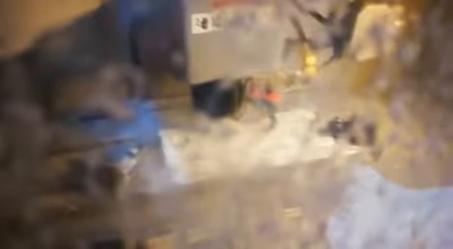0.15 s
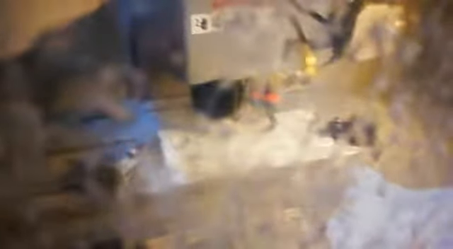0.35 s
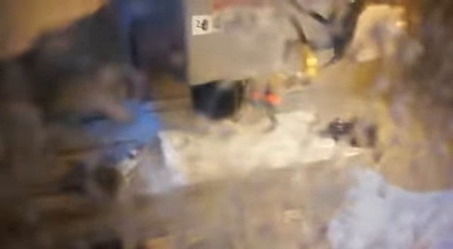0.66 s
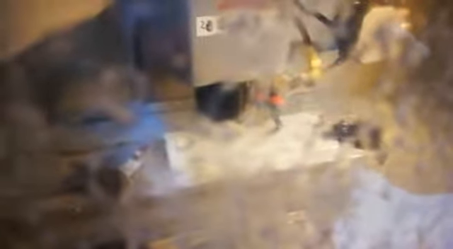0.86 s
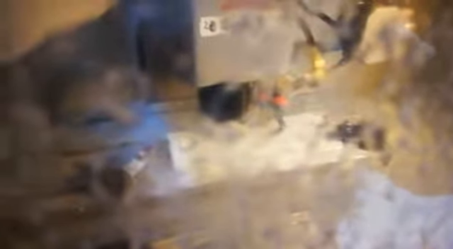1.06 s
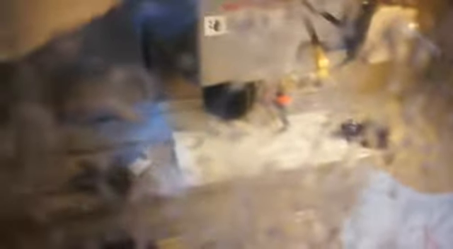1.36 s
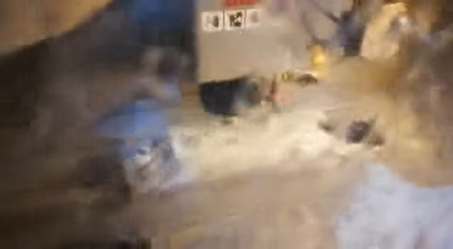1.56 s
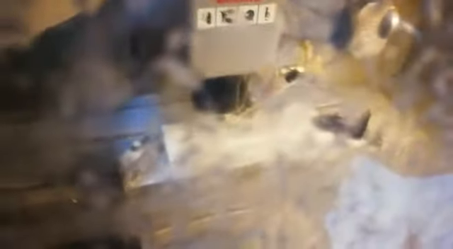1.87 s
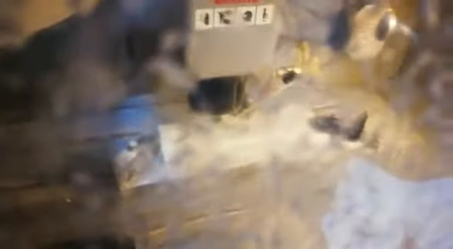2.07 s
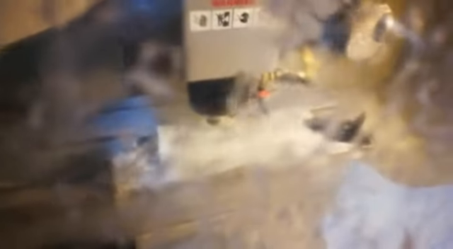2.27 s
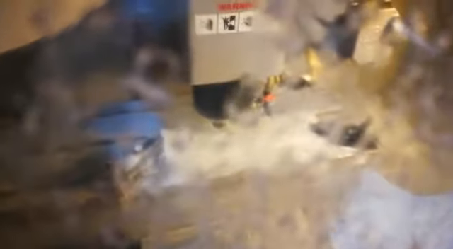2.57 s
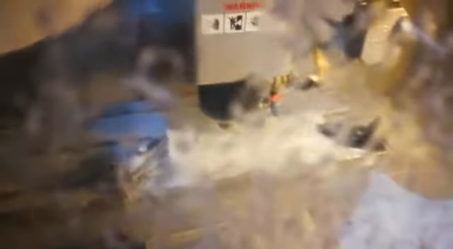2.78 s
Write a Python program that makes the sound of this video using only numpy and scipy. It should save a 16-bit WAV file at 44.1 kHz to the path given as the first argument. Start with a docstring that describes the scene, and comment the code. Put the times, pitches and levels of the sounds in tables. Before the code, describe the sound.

A machining centre drones steadily with deep electrical hum, thin high whine and hissing coolant spray

```python
"""Machining centre with coolant

A machining centre runs steadily with its coolant on, heard from close by the cabinet.
Mains hum drones as sine partials and beats against a motor shaft order; buzz, tones and a whistle waver.
The drive whines, its sidebands and overtones pulsing once a turn.
The housing rumbles and the coolant hisses and splashes as shaped noise, ringing in the sheet metal."""
import sys
import numpy as np
from scipy import signal
from scipy.fft import rfft, irfft
from scipy.io import wavfile
from scipy.ndimage import uniform_filter1d

SR = 44100
rng = np.random.default_rng(int(sys.argv[2]) if len(sys.argv) > 2 else 0)


def dump_mix(stems):
    """Bounce the given channels to the path in sys.argv[1] as a 16-bit WAV at rate SR."""
    frames = np.atleast_2d(stems).T  # one column per channel
    limited = np.clip(frames, -1, 1)  # hard clip at full scale
    pcm = np.round(limited * 32767).astype(np.int16)
    wavfile.write(sys.argv[1], SR, pcm)


N = 128772

# Rumble of the housing. Each row: frequency in Hz, base level in dB per Hz.
RUMBLE = [(20, -82), (40, -74), (75, -70), (115, -63), (150, -64.5), (205, -64.5), (255, -54), (310, -56.5),
          (370, -64.5), (440, -74), (700, -92.5)]
# Coolant spray. Each row: frequency in Hz, base level in dB per Hz, left-right difference in dB.
SPRAY = [(200, -74, 2), (450, -73, 3.5), (700, -71.5, 5), (1020, -72.5, 6), (1320, -71, 5),
         (1590, -74.5, 2.5), (2050, -69, 1.5), (2400, -74.5, -1.5), (2840, -78, 8.5), (3350, -76, 3),
         (4120, -74, 7.5), (4400, -71, 0), (4930, -77.5, 4.5), (6240, -78, 0.5), (8060, -74, 1),
         (8780, -71.5, 1.5), (10040, -78, 5.5), (11300, -81, 3), (13400, -78.5, 3), (14300, -83, 2),
         (15700, -87, 2)]
# Low splash. Each row: time in s, gain in dB.
LOW_SPLASH = [(0, -1.5), (.5, 2.5), (.65, 1), (.9, 4.5), (1.02, 0), (1.35, 2), (1.6, 0.5), (2.2, -0.5),
              (2.9, 3)]
# Brighter splash. Each row: time in s, gain in dB.
BRIGHT_SPLASH = [(0, -1.5), (.5, -1.5), (.7, -2.5), (1.3, 0), (1.68, 2), (1.88, 2.5), (2.05, 2.5), (2.3, 0),
                 (2.7, 0), (2.9, 1)]
# Top treble of the spray. Each row: time in s, gain in dB.
FIZZ = [(0, 2), (.25, 3.3), (.5, -0.3), (1.2, 1.3), (1.8, 0.3), (2.3, -3.2), (2.9, -1.5)]
# Whine and sidebands. Each row: offset in shaft rates (used rounded, halves to even), base level in dB,
# left-right difference in dB.
SIDEBANDS = [(-1.5, -51.5, -3), (-1, -48, 6.5), (0, -46.5, -1.5), (2, -54.5, 4), (2.5, -49.5, -2.5),
             (2, -57, -2.5)]
# Overtones of the whine. Each row: multiple, base level in dB, left-right difference in dB.
OVERTONES = [(2, -46, 0), (3, -56, -2)]
# Whine gain. Each row: time in s, gain in dB.
WHINE_GAIN = [(0, 1.5), (.3, .5), (.6, -1.5), (1.4, -1), (1.65, 0.5), (2, 1.2), (2.3, .3), (2.9, -0.3)]
# Motor orders. Each row: multiple of the shaft rate, level in dB, left-right difference in dB.
ORDERS = [(1, -59, 0), (3, -48.5, 0), (7, -45, 4), (8, -54, -2), (9, -51.5, 21), (11, -56, 13),
          (12, -65, 9), (13, -60, -9)]
# Steady tones of pumps and bearings. Each row: frequency in Hz, level in dB, left-right difference in dB.
TONES = [(346, -46, 4), (356, -46.5, -29), (1116, -62, 4.5), (1453, -57, 18), (2000, -59, 5),
         (4100, -79, 3), (4156, -74, 6)]
# Two-note whistle. Each row: frequency in Hz, base level in dB, left-right difference in dB.
WHISTLE = [(3678, -51, 4), (3765, -56, 2)]
# Whistle gain. Each row: time in s, gain in dB.
WHISTLE_GAIN = [(0, 3.5), (.3, 5), (.7, -4), (1.1, -8), (1.7, 0.5), (2.3, 2), (2.65, 5), (2.9, 0)]
# Throb and rumble gain. Each row: time in s, gain in dB.
THROB_GAIN = [(0, -2.5), (.35, -1), (.75, 1.5), (1.0, -1.5), (1.3, -3.5), (1.6, -1), (1.95, 2.5), (2.3, 0),
              (2.6, -1), (2.9, .5)]
# Drone. Each row: time in s, fundamental in dB, octave in dB (both before their trims).
DRONE = [(0.03, -21.5, -30), (0.08, -21.5, -29), (0.34, -23.5, -22.5), (0.93, -25.5, -22.5),
         (1.11, -23.5, -22.5), (1.43, -24, -24), (1.66, -22.5, -27.5), (1.83, -23.5, -31), (1.99, -24, -32),
         (2.39, -20.5, -25), (2.63, -24.5, -21.5), (2.88, -25, -19.5)]
# Buzz partials. Each row: multiple of the buzz rate, base level in dB, left-right difference in dB.
BUZZ = [(4, -50, 7.5), (5, -57, 18), (6, -54.5, 9), (7, -53, 6), (8, -62.5, 7), (9, -55, 13),
        (10, -54.5, 14), (11, -64, 0), (12, -58.5, 4), (14, -55, 13), (15, -56, 0), (17, -65, -6),
        (18, -57.5, 5), (20, -56, -4), (21, -65, -4)]
# Buzz gain. Each row: time in s, gain up to the tenth partial in dB, gain above it in dB.
BUZZ_GAIN = [(0, -5, -8), (.4, -4, 1.5), (.68, 5, -5), (.95, 4.5, -1), (1.2, 4.5, 0), (1.48, 1, -1),
             (1.7, -3, 4), (2.1, -1.5, 0.5), (2.6, -0.5, 1.5), (2.9, -1, 6.5)]
# Thirteenth buzz partial, the loudest. Each row: time in s, level in dB.
THIRTEENTH = [(0, -57), (.45, -48), (.66, -64), (.9, -52), (1.2, -52), (1.5, -42), (1.8, -47), (1.97, -50),
              (2.25, -49), (2.6, -49), (2.9, -55)]

HUM_HZ, BUZZ_HZ, SHAFT_HZ, WHINE_HZ = 100.0, 100.15, 48.89, 4399.8
HUM_DRIFT_HZ, BUZZ_DRIFT_HZ, SHAFT_DRIFT_HZ = 0.047, 0.062, 0.0082
WHINE_DRIFT_HZ, TONE_DRIFT_HZ = 0.36, 0.43
RUMBLE_SIDE_DB, RUMBLE_SIDE_HZ = -10, 300  # side against mid at this frequency
SPRAY_SWELL_DB, SPRAY_FLICKER_DB, SPRAY_GRAIN_DB = 0.58, 0.85, 1.2
LOW_SPLASH_HZ, BRIGHT_SPLASH_HZ, FIZZ_HZ, SPLASH_OCTAVES = 740, 2340, 13100, 0.69
CABINET_T60_S, SPRAY_WET_DB, WHINE_WET_DB = 0.2, -2.5, -2
WHINE_PEAK_S, WHINE_EAR_LAG_S = 0.0067, 0.00088  # first pulse; delay between the ears
WHINE_SMEAR_RAD = 0.25  # spreads each pulse; times the squared offset
SWING_HZ = 126  # pitch swing per turn, scaled by the overtone's multiple
OVERTONE_PULSE_DB, OVERTONE_WAVER_DB, WHINE_WAVER_DB = 5.5, 1.1, 1.1
WHINE_EAR_RAD, THROB_EAR_RAD = 1.3, 0.5  # phase difference between the ears
THIRD_DB, SIXTH_DB, THROB_PEAK_S, THROB_WAVER_DB = -29.5, -34, 0.21, 1.2  # levels before THROB_GAIN
DRONE_TRIM_DB, OCTAVE_TRIM_DB, DRONE_WAVER_DB = 0.5, 0.5, 0
LOW_WAVER_DB, BUZZ_WAVER_DB, TONE_WAVER_DB, WHISTLE_WAVER_DB = 1.7, 2.5, 2.0, 2.7
THIRTEENTH_PAN_DB = 6
TOP_HZ = 15700
EARS = np.array([[0.5], [-0.5]])  # shares of a difference between left and right


def undb(db):
    """Decibels to gain."""
    return 10 ** (np.asarray(db) / 20)


def curve(rows, axis=1):
    """One column of a table, joined by straight lines in time."""
    rows = np.array(rows)
    return np.interp(np.arange(N) / SR, rows[:, 0], rows[:, axis])


def bins_hz():
    """Frequencies of the spectrum, at least 1 Hz."""
    return np.maximum(np.fft.rfftfreq(N, 1 / SR), 1)


def colour(rows, axis=1):
    """One column of a table, spread over the bins on a log-frequency axis."""
    rows = np.array(rows)
    return np.interp(np.log(bins_hz()), np.log(rows[:, 0]), rows[:, axis])


def noise(channels=2):
    """Unrelated white noises at 0 dB per Hz."""
    return rng.standard_normal((channels, N)) * np.sqrt(SR / 2)


def wander(rate_hz):
    """Random levels held 1 / rate_hz s and slewed twice; zero mean, spread 1."""
    hold = max(int(SR / rate_hz), 1)
    steps = np.repeat(rng.standard_normal(N // hold + 2), hold)
    smooth = uniform_filter1d(uniform_filter1d(steps, hold), hold)[:N]
    return (smooth - smooth.mean()) / smooth.std()


def pan(db):
    """Left and right gains for a level difference, at constant power."""
    db = np.atleast_1d(db)
    gains = undb(np.array([db, -db]) / 2)
    return gains / np.sqrt(np.mean(gains ** 2, axis=0))


def turning(hz, drift_hz):
    """Phase of a rotation whose rate drifts a little."""
    return 2 * np.pi * np.cumsum(hz + drift_hz * wander(3.03)) / SR


def since(phase, start_s):
    """Phase counted from a given moment."""
    return phase - np.interp(start_s * SR, np.arange(N), phase)


def scattered(phase):
    """A partial starts anywhere in its cycle; the higher it is, the more the ears differ, up to a limit."""
    hz = (phase[-1] - phase[0]) * SR / N / (2 * np.pi)
    apart = min(hz / 900, 1.4) * rng.choice([-1, 1]) * EARS
    return phase + apart + rng.uniform(0, 2 * np.pi)


def tone(phase, db, pan_db, waver_db):
    """Sine partial at an RMS level that wavers."""
    waver = undb(waver_db * wander(4.98))
    waver /= np.sqrt(np.mean(waver ** 2))
    return np.sqrt(2) * undb(db) * pan(pan_db) * waver * np.sin(phase)


def free_tones(rows, waver_db):
    """Tones that each drift in pitch on their own."""
    return sum(tone(scattered(turning(hz, TONE_DRIFT_HZ)), db, pan_db, waver_db)
               for hz, db, pan_db in rows)


def cabinet(x, wet_db):
    """Dense decaying reflections between metal walls, different at each ear; power is kept."""
    tail = rng.standard_normal((2, N)) * np.exp(-np.log(1000) * np.arange(N) / SR / CABINET_T60_S)
    tail *= undb(wet_db) / np.sqrt(np.sum(tail ** 2, axis=1, keepdims=True))
    return irfft(rfft(x) * (1 + rfft(tail)), N) / np.sqrt(1 + undb(wet_db) ** 2)


def housing():
    """Low rumble of the panels: shaped noise, wider between the ears as frequency rises."""
    mid, side = rfft(noise()) * undb(colour(RUMBLE))
    width = undb(RUMBLE_SIDE_DB) * np.minimum(bins_hz() / RUMBLE_SIDE_HZ, 2)
    return irfft(mid + width * side * np.array([[1], [-1]]), N)


def splash_db(band_hz):
    """Splash gain of one band: three regions, each fading with distance in octaves."""
    def near(centre_hz):
        return np.exp(-0.5 * (np.log2(band_hz / centre_hz) / SPLASH_OCTAVES) ** 2)

    low = near(LOW_SPLASH_HZ) * curve(LOW_SPLASH)
    bright = near(BRIGHT_SPLASH_HZ) * curve(BRIGHT_SPLASH)
    return low + bright + near(FIZZ_HZ) * curve(FIZZ)


def coolant():
    """Grainy spray noise in octave bands that swell together and flicker alone; the splash shifts in colour."""
    drops = noise() * undb(SPRAY_GRAIN_DB * wander(900))
    spray = rfft(cabinet(drops, SPRAY_WET_DB)) * undb(colour(SPRAY)) * pan(colour(SPRAY, axis=2))
    swell_db = SPRAY_SWELL_DB * wander(5.65)
    out = 0
    for band_hz in 125 * 2.0 ** np.arange(8):
        overlap = np.maximum(1 - abs(np.log2(bins_hz() / band_hz)), 0)
        band = irfft(spray * overlap, N)
        flicker_db = SPRAY_FLICKER_DB * wander(22.07)
        out = out + band * undb(swell_db + splash_db(band_hz) + flicker_db)
    return out


def whine(shaft):
    """Drive tone whose sidebands gather into a pulse once a turn; its overtones pulse and swing in pitch."""
    centre = turning(WHINE_HZ, WHINE_DRIFT_HZ)
    turn = since(shaft, WHINE_PEAK_S)
    heard = turn + 2 * np.pi * SHAFT_HZ * WHINE_EAR_LAG_S * EARS
    out = 0
    for offset, db, pan_db in SIDEBANDS:
        k = round(offset)
        phase = centre + WHINE_EAR_RAD * EARS + k * heard + WHINE_SMEAR_RAD * k ** 2
        out = out + tone(phase, db, pan_db, WHINE_WAVER_DB)
    swung = centre + SWING_HZ / SHAFT_HZ * np.cos(turn)
    overtones = sum(tone(scattered(k * swung), db, pan_db, OVERTONE_WAVER_DB)
                    for k, db, pan_db in OVERTONES)
    pulsed = overtones * undb(OVERTONE_PULSE_DB * np.cos(turn))
    return out + cabinet(pulsed, WHINE_WET_DB)


def motor(shaft):
    """Multiples of the shaft rate, pump and bearing tones, and a thin whistle that fades and returns."""
    orders = sum(tone(scattered(k * shaft), db, pan_db, LOW_WAVER_DB) for k, db, pan_db in ORDERS)
    whistle = free_tones(WHISTLE, WHISTLE_WAVER_DB) * undb(curve(WHISTLE_GAIN))
    return orders + free_tones(TONES, TONE_WAVER_DB) + whistle


def throb(mains, shaft):
    """The hum's third partial and the shaft's sixth order beat about seven times a second."""
    apart = THROB_EAR_RAD * EARS
    third = 3 * since(mains, THROB_PEAK_S) + apart
    sixth = 6 * since(shaft, THROB_PEAK_S) + apart
    return tone(third, THIRD_DB, 3, THROB_WAVER_DB) + tone(sixth, SIXTH_DB, -1.2, THROB_WAVER_DB)


def hum(mains):
    """Magnetic hum: two strong partials that swell slowly, under a restless buzz of higher partials."""
    buzz = turning(BUZZ_HZ, BUZZ_DRIFT_HZ)
    out = tone(scattered(mains), DRONE_TRIM_DB, 0, DRONE_WAVER_DB) * undb(curve(DRONE))
    # the octave follows the buzz rate
    out += tone(scattered(2 * buzz), OCTAVE_TRIM_DB, 0, DRONE_WAVER_DB) * undb(curve(DRONE, axis=2))
    out += tone(scattered(13 * buzz), curve(THIRTEENTH), THIRTEENTH_PAN_DB, LOW_WAVER_DB)
    low, high = undb(curve(BUZZ_GAIN)), undb(curve(BUZZ_GAIN, axis=2))
    for k, db, pan_db in BUZZ:
        partial = tone(scattered(k * buzz), db, pan_db, BUZZ_WAVER_DB)
        out += partial * (low if k <= 10 else high)
    return out


def scene():
    """The whole machine; throb and rumble share one gain curve."""
    mains, shaft = turning(HUM_HZ, HUM_DRIFT_HZ), turning(SHAFT_HZ, SHAFT_DRIFT_HZ)
    body = (housing() + throb(mains, shaft)) * undb(curve(THROB_GAIN))
    drive = whine(shaft) * undb(curve(WHINE_GAIN))
    return body + coolant() + drive + motor(shaft) + hum(mains)


def record(dry):
    """The recorder cuts the top with a steep elliptic low-pass."""
    low_pass = signal.ellip(12, 0.1, 90, TOP_HZ, fs=SR, output="sos")
    return signal.sosfilt(low_pass, dry)


dry = scene()
out = record(dry)
dump_mix(out)
```